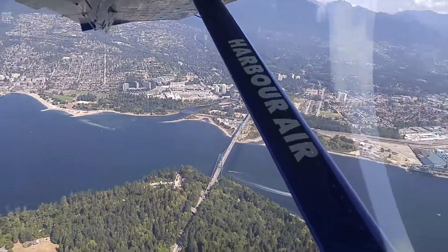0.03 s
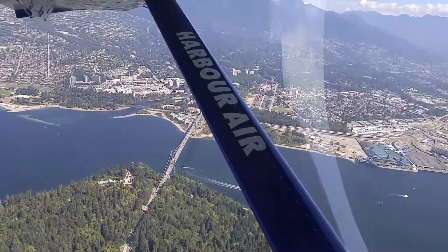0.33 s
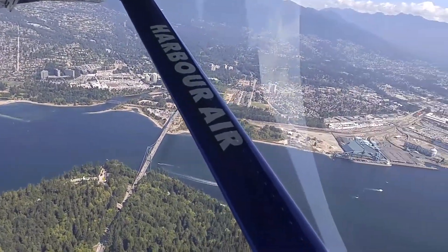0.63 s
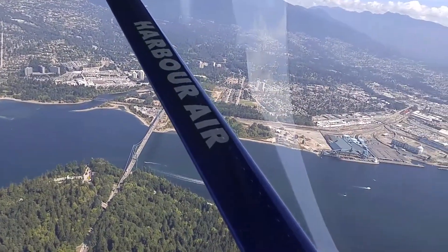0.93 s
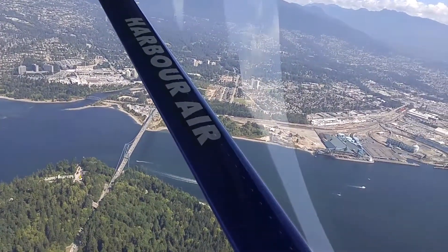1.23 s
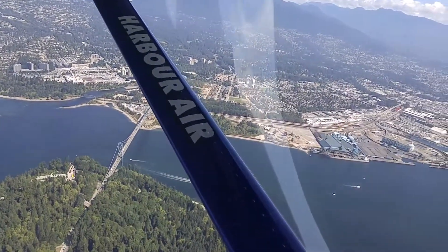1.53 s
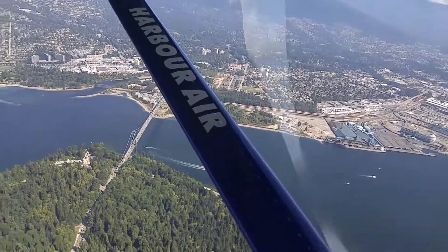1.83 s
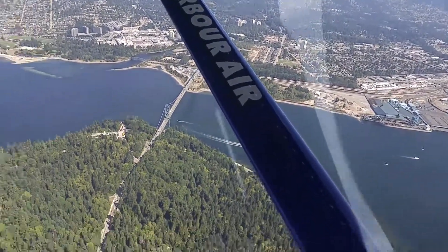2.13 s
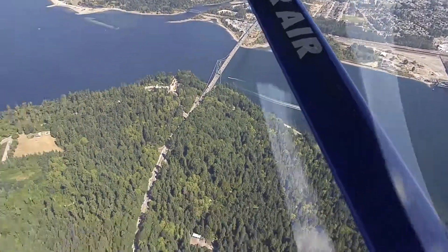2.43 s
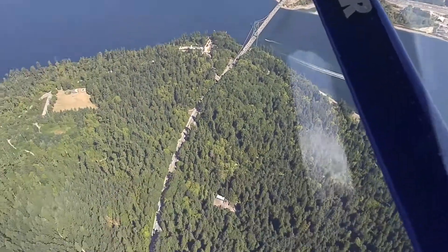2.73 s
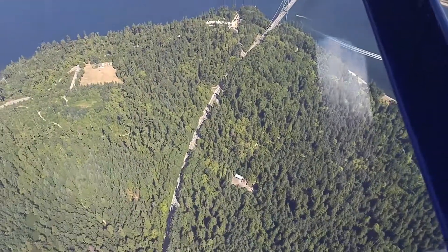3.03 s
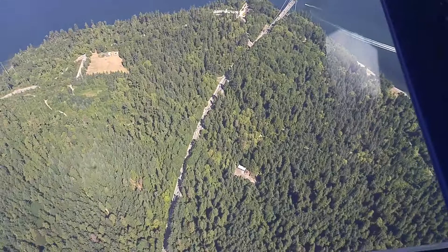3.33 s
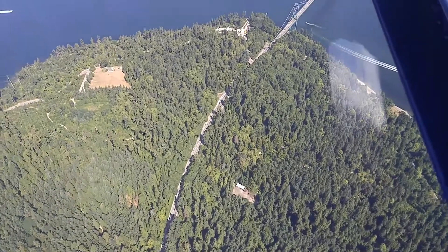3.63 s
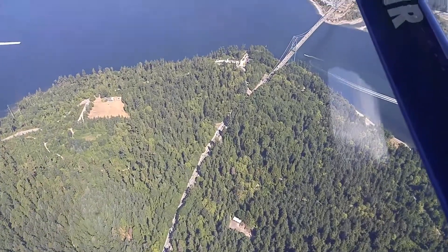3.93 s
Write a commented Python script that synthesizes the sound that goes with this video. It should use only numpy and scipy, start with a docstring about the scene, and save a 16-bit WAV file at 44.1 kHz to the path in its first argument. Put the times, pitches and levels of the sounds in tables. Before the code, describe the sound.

A small plane's propeller drones steadily in flight, heard from a window seat inside the cabin. A deep rumble and roar run underneath throughout, with a hiss of air and a thin, fluttering engine whine above.

```python
"""A three-blade propeller drones, heard inside a small turboprop plane in steady flight.
The drone is a stack of tones, each a whole multiple of the shaft's turning speed. Under it,
the propeller's wind and the exhaust rumble through the walls, and the cabin panels roar.
Air hisses and rushes along the window, the engine's compressor gives a thin, fluttering
whine, and the gears sing faintly."""
import sys
import numpy as np
from scipy import signal
from scipy.fft import rfft, irfft
from scipy.io import wavfile
from scipy.ndimage import uniform_filter1d

SR = 44100
rng = np.random.default_rng(int(sys.argv[2]) if len(sys.argv) > 2 else 0)


def transcribe(signal):
    """Save signal, clipped to [-1, 1], as a 16-bit WAV file at the path in sys.argv[1]."""
    frames = np.atleast_2d(signal).T
    limited = np.clip(frames, -1, 1)
    pcm = np.round(limited * 32767).astype(np.int16)
    wavfile.write(sys.argv[1], SR, pcm)


N = 176400  # samples: 4 seconds


# The tones of the drone. Columns: shaft_multiple, level_db, left_minus_right_db
DRONE_TONES = [(2, -36.5, 1), (3, -21, 0), (4, -35.5, -3), (5, -26.5, -1), (6, -18.5, 0.8), (8, -36, 0),
               (9, -41, 6), (10, -39.5, 8), (12, -39.5, 4), (13, -37.5, 2), (14, -47, 8), (15, -60, 0),
               (18, -39, 6), (19, -44, 3), (20, -43, 3), (21, -41.5, 3)]

def propeller(shaft_hz=31.752, speed_drift=0.00065, waver_turns=0.0065, swell_db=1.23):
    """The blades beat the air, making tones that all follow one nearly steady shaft speed."""
    turns = np.cumsum(shaft_hz * (1 + speed_drift * wobble(rate_hz=3.1))) / SR
    # Uneven air shifts the blade pulses, so the high tones waver most.
    turns += waver_turns * wobble(rate_hz=7)
    drone = 0
    for multiple, level_db, left_minus_right_db in DRONE_TONES:
        wave = np.sqrt(2) * np.sin(2 * np.pi * (multiple * turns + rng.random()))
        gain = db_to_gain(level_db + swell_db * wobble(rate_hz=6.85))
        drone = drone + wave * gain * left_right_gains(left_minus_right_db)
    return drone


# How strong the rumble is from low to high. Columns: pitch_hz, level_db_per_hz
RUMBLE_SPECTRUM = [(12, -82), (27, -70), (38, -59), (49, -47), (80, -41), (103, -38), (135, -41),
                   (158, -38), (205, -40), (270, -41), (335, -40), (420, -48), (470, -57.5), (760, -65.5),
                   (1250, -63), (1580, -63), (1880, -61), (2400, -70.5), (2900, -81.5), (5000, -100)]
# Its slight rise and fall. Columns: time_s, change_db
RUMBLE_CHANGES = [(0, -0.5), (.6, 0.36), (1.6, -0.7), (2.6, -0.2), (3.3, -1), (4, -0.5)]

def wall_rumble(buffet_db=0.02):
    """The propeller's wind and the exhaust come through the cabin walls as a deep noise."""
    buffeting = db_to_gain(buffet_db * wobble(rate_hz=18))
    return cabin_noise(RUMBLE_SPECTRUM) * buffeting * gain_over_time(RUMBLE_CHANGES)


# How strong the roar is from low to high. Columns: pitch_hz, level_db_per_hz
ROAR_SPECTRUM = [(300, -100), (470, -58.5), (570, -45), (650, -44), (760, -49), (1050, -52.5), (1250, -61),
                 (1580, -70.5), (2400, -110)]
# It eases a little after three seconds. Columns: time_s, change_db
ROAR_CHANGES = [(0, 0), (.6, .6), (1.6, 0.5), (2.5, 0.3), (3.2, -0.8), (4, 0)]

def panel_roar():
    """The cabin panels give off a noise of middle pitch."""
    return cabin_noise(ROAR_SPECTRUM) * gain_over_time(ROAR_CHANGES)


# How strong the hiss is from low to high. Columns: pitch_hz, level_db_per_hz
HISS_SPECTRUM = [(1500, -87), (2900, -73), (4300, -72.5), (5500, -73.5), (6500, -70.5), (7350, -65.5),
                 (7800, -70.5), (8100, -65), (8600, -65), (9300, -70), (10500, -75.5), (12000, -79),
                 (13800, -79.3), (15600, -89)]
# Its slight fall and rise. Columns: time_s, change_db
HISS_CHANGES = [(0, 0.3), (2.5, -0.16), (3.3, -0.5), (4, 0.5)]

def air_hiss():
    """Moving air makes a smooth, high noise."""
    return cabin_noise(HISS_SPECTRUM) * gain_over_time(HISS_CHANGES)


# The nearly steady pitch of the compressor blades. Columns: time_s, pitch_hz
WHINE_NOTE = [(0, 9781), (1.3, 9782), (1.6, 9785), (2.7, 9785), (3.0, 9782), (4, 9782)]
# The pure tone fades midway and returns stronger. Columns: time_s, change_db
WHINE_CHANGES = [(0, 1), (.33, 4), (.55, 1), (1.0, 1), (1.3, -.5), (1.7, -6), (2.2, -.5), (2.6, -4),
                 (3.05, -2), (3.45, 5), (3.75, 4), (4, 3)]
# Bands of noise around that tone. Columns: width_hz, level_db
WHINE_BANDS = [(90, -35.5), (380, -36.5)]
# The slight rise and fall of those bands. Columns: time_s, change_db
BAND_CHANGES = [(0, -1.5), (1.1, -0.5), (1.8, 0), (3.1, -.8), (3.5, 1.2), (4, 1)]

def compressor_whine(tone_db=-38, flutter_db=1.05):
    """The compressor blades make a thin, fluttering tone; swirling air smears it into noise."""
    pitch_hz = over_time(WHINE_NOTE)
    whine = wandering_tone(pitch_hz, width_hz=0.25) * db_to_gain(tone_db) * gain_over_time(WHINE_CHANGES)
    offset_hz = spectrum_pitches() - pitch_hz.mean()
    for width_hz, level_db in WHINE_BANDS:
        noise_spectrum = rfft(rng.standard_normal((2, N)))
        band = irfft(noise_spectrum / (1 + 2j * offset_hz / width_hz), N)  # keep what is near the tone
        whine += band / band.std() * db_to_gain(level_db) * gain_over_time(BAND_CHANGES)
    return whine * db_to_gain(flutter_db * wobble(rate_hz=45.1))


# The tones of the gears and the parts they drive. Columns: pitch_hz, width_hz
GEAR_NOTES = [(578, 5), (916, 14), (1424, 12), (1692, 3), (1834, 3), (2698, 2), (3550, 3), (4733, 3),
              (4892, 3), (5503, 3), (6725, 3), (7337, 3), (7948, 3), (8559, 3), (9878, 5)]
# How loud each of those tones is. Columns: left_db, right_db
GEAR_LEVELS = [(-35, -48), (-36, -48), (-44, -41), (-48, -57), (-48, -59), (-53.5, -50), (-59, -71),
               (-71, -62), (-61, -60), (-52, -62), (-52, -52), (-55, -60), (-54, -60), (-54, -54),
               (-55, -55)]

def gears():
    """The gearbox and the parts it drives sing faint, steady tones."""
    return sum(wandering_tone(pitch_hz, width_hz) * db_to_gain(levels_db)[:, None]
               for (pitch_hz, width_hz), levels_db in zip(GEAR_NOTES, GEAR_LEVELS))


# How strong the rush is from low to high. Columns: pitch_hz, level_db_per_hz
RUSH_SPECTRUM = [(1200, -100), (1900, -67), (2200, -67), (2500, -72.5), (3200, -100), (6000, -120)]
# It dips early, then grows in two surges. Columns: time_s, change_db
RUSH_CHANGES = [(0, -7), (1.2, -17), (2.2, -1), (2.8, -7), (3.15, 2.5), (3.55, 1), (4, -1)]

def window_rush():
    """Air sliding along the window makes a soft rush."""
    return cabin_noise(RUSH_SPECTRUM) * gain_over_time(RUSH_CHANGES)


# How alike the cabin's echoes leave the two sides (1 same, -1 opposite). Columns: pitch_hz, likeness
SIDE_LIKENESS = [(60, .99), (200, 0.97), (300, 0.82), (430, 0.6), (600, 0.4), (790, -0.51), (1050, 0.43),
                 (1300, -0.12), (1480, -0.45), (1900, 0.072), (2300, 0.17), (3000, -0.024)]
# Which side is louder. Columns: pitch_hz, left_minus_right_db
SIDE_BALANCE = [(110, 0.5), (200, .4), (350, 2), (650, 2), (1100, .3), (1650, 2.5), (2000, 0), (3200, 3.5),
                (4300, -1.3), (6000, 1.5), (8000, 2), (9000, 0.5), (15000, 0)]

def cabin_noise(spectrum):
    """Noise of swirling air, shaped by the cabin: alike in both ears when low, different when high."""
    shared, opposite = rfft(rng.standard_normal((2, N)))
    likeness = np.clip(over_pitch(SIDE_LIKENESS), -0.999, 0.999)
    pair = shared * np.sqrt(1 + likeness) + opposite * np.sqrt(1 - likeness) * np.array([[1], [-1]])
    shaped = pair * db_to_gain(over_pitch(spectrum)) * left_right_gains(over_pitch(SIDE_BALANCE))
    return irfft(shaped, N) * np.sqrt(SR) / 2


def wandering_tone(pitch_hz, width_hz):
    """A tone whose timing wanders on its way to each ear; more width makes it less pure."""
    wander = np.cumsum(rng.standard_normal((2, N)), axis=1) * np.sqrt(2 * np.pi * width_hz / SR)
    start_turns = rng.random() + np.array([[0], [1 / 4]])  # the sides start a quarter cycle apart
    turns = start_turns + np.cumsum(pitch_hz * np.ones(N)) / SR
    return np.sqrt(2) * np.sin(2 * np.pi * turns + uniform_filter1d(wander, size=200, axis=1))


def wobble(rate_hz):
    """A smooth random curve, typically about 1 away from zero, with rate_hz new values a second."""
    hold_samples = int(SR / rate_hz)
    steps = rng.standard_normal(2000)[np.arange(N) // hold_samples]
    return 1.23 * uniform_filter1d(uniform_filter1d(steps, hold_samples), hold_samples)


def db_to_gain(db):
    """Turn decibels into a number to multiply the sound by."""
    return 10 ** (np.asarray(db) / 20)


def left_right_gains(left_minus_right_db):
    """Turn one side up and the other down by half the difference each."""
    return db_to_gain(np.array([left_minus_right_db, -left_minus_right_db]).reshape(2, -1) / 2)


def over_time(points):
    """Join (time_s, value) points with straight lines."""
    return np.interp(np.arange(N) / SR, *np.array(points).T)


def gain_over_time(points):
    """Turn (time_s, change_db) points into a gain for every sample."""
    return db_to_gain(over_time(points))


def spectrum_pitches():
    """The pitch in Hz of each slot in a spectrum, never below 1."""
    return np.maximum(np.arange(N // 2 + 1) * SR / N, 1)


def over_pitch(points):
    """Join (pitch_hz, value) points, giving every octave the same room."""
    pitch_hz, values = np.array(points, float).T
    return np.interp(np.log(spectrum_pitches()), np.log(pitch_hz), values)


def scene():
    """All the sources together, as heard from a window seat."""
    return propeller() + wall_rumble() + panel_roar() + air_hiss() + window_rush() \
        + gears() + compressor_whine()


def record(dry, ceiling=0.95, fade_s=0.004, top_hz=15700):
    """Round off the rare highest peaks, fade both ends and cut the very highest pitches."""
    rounded = dry / (1 + (dry / ceiling) ** 12) ** (1 / 12)
    fades = signal.windows.tukey(N, 2 * fade_s * SR / N)
    low_pass = signal.ellip(12, 0.05, 60, top_hz, fs=SR, output="sos")
    return signal.sosfiltfilt(low_pass, rounded * fades)


dry = scene()
out = record(dry)
transcribe(out)
```